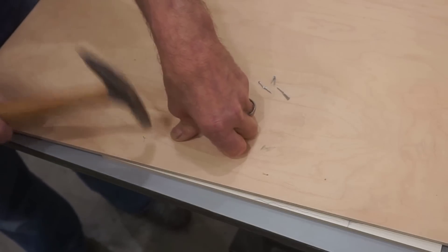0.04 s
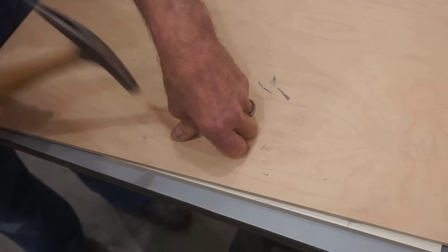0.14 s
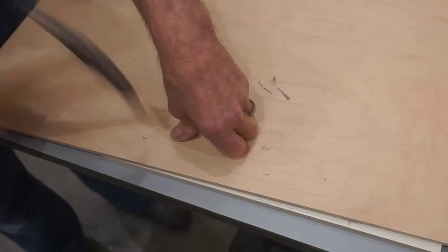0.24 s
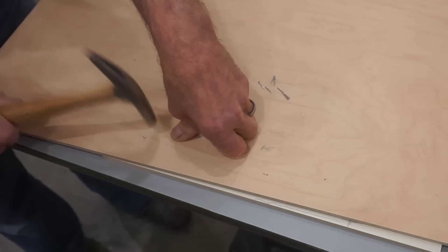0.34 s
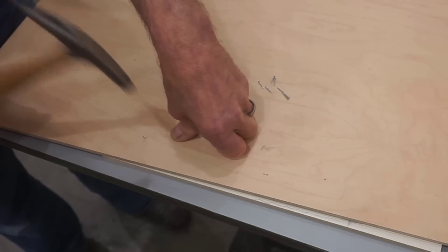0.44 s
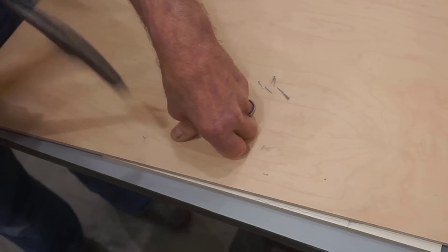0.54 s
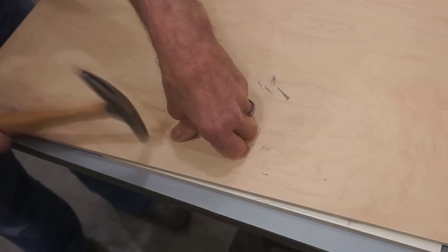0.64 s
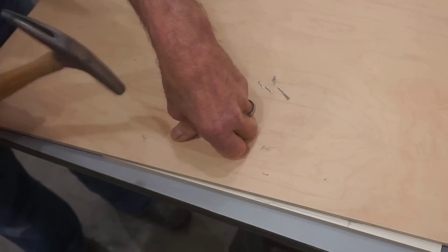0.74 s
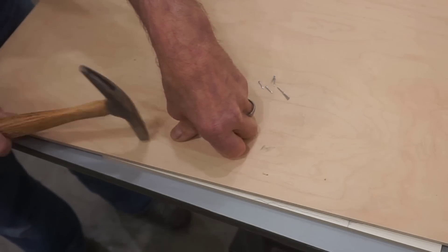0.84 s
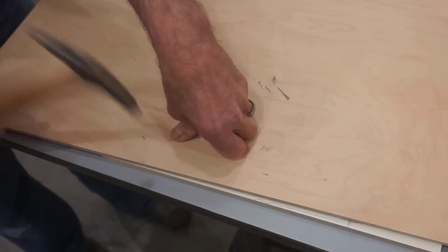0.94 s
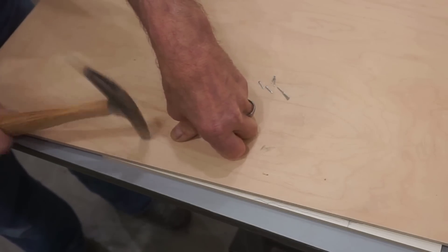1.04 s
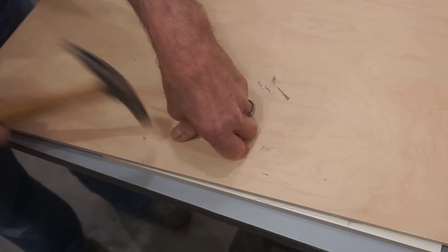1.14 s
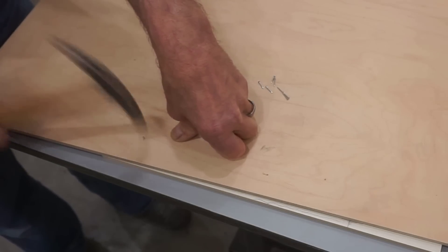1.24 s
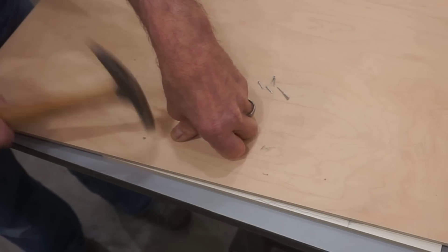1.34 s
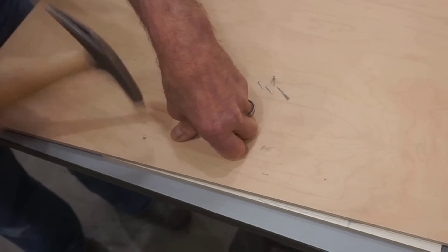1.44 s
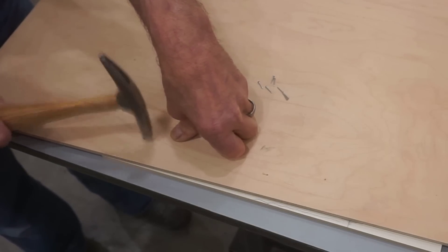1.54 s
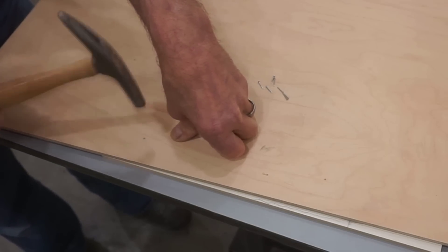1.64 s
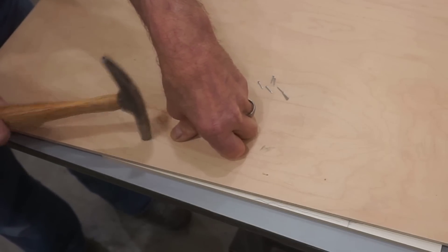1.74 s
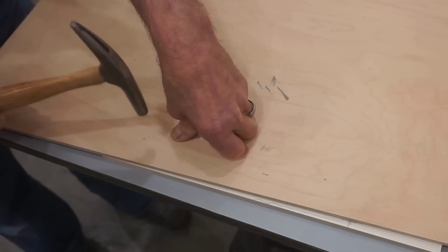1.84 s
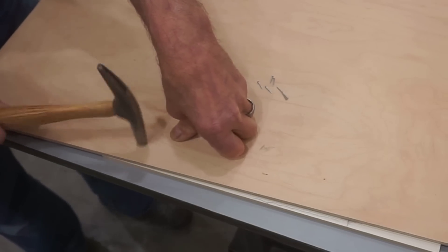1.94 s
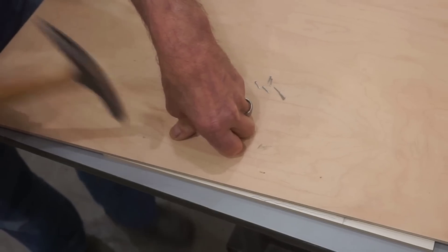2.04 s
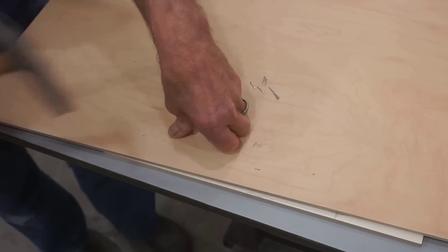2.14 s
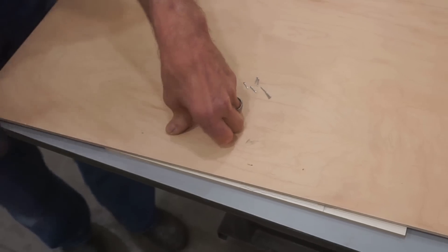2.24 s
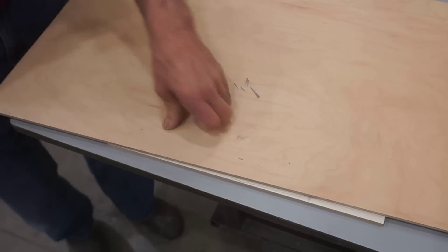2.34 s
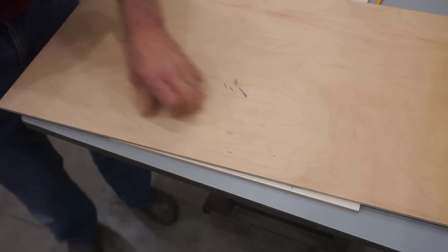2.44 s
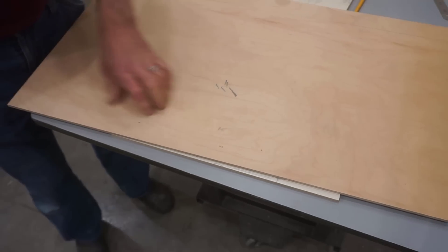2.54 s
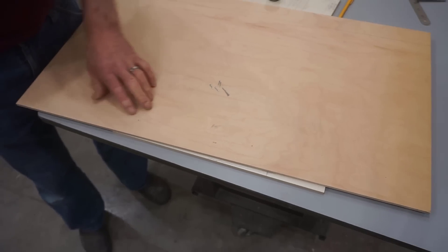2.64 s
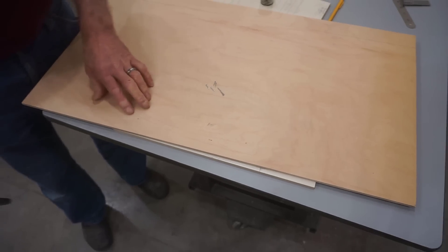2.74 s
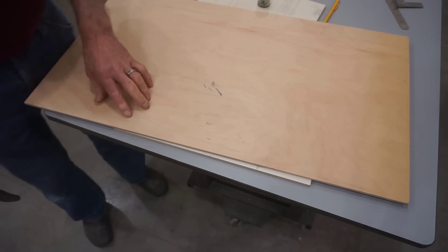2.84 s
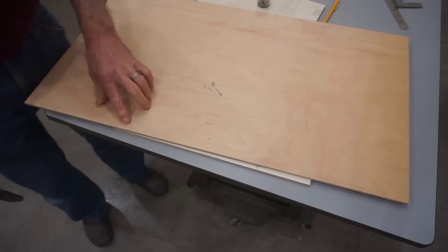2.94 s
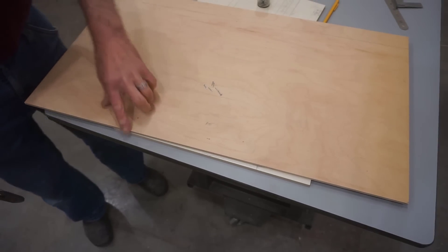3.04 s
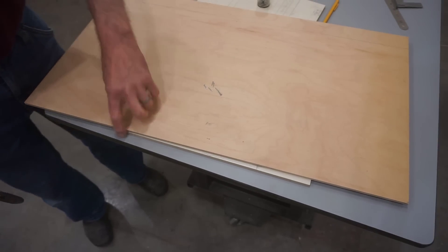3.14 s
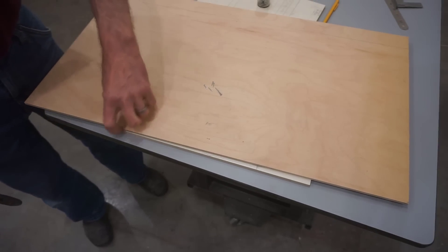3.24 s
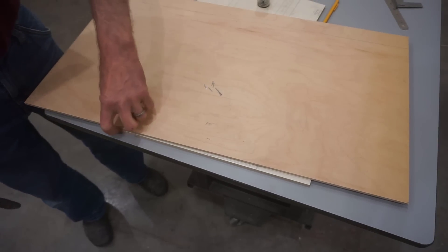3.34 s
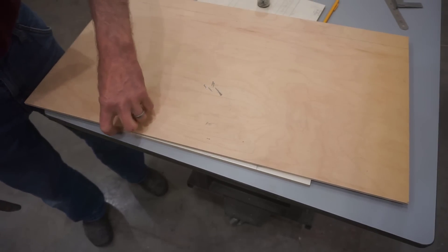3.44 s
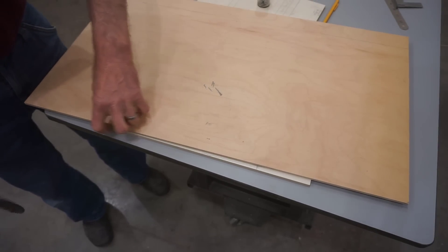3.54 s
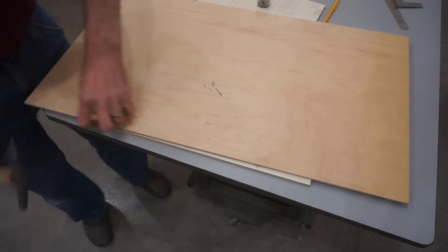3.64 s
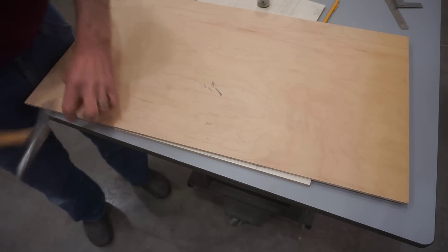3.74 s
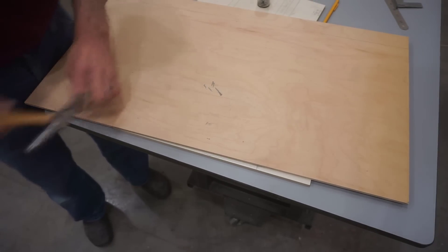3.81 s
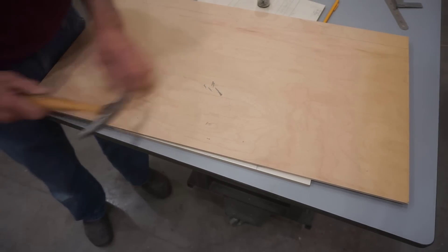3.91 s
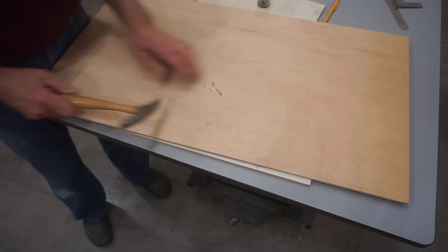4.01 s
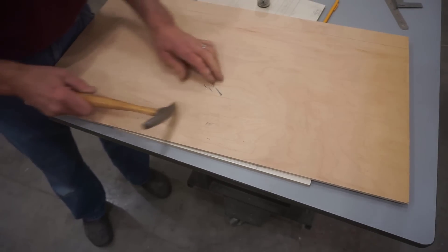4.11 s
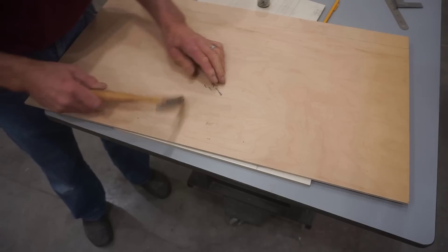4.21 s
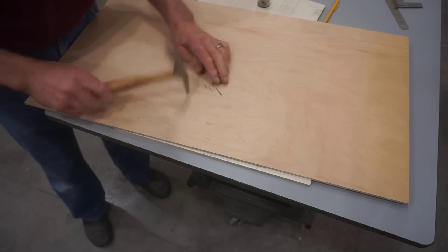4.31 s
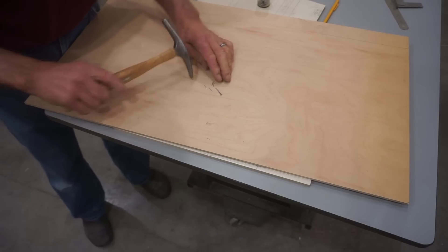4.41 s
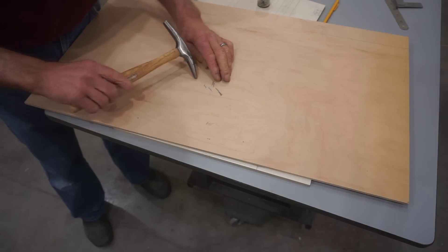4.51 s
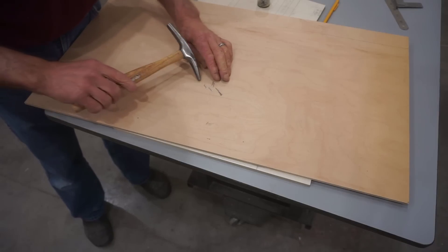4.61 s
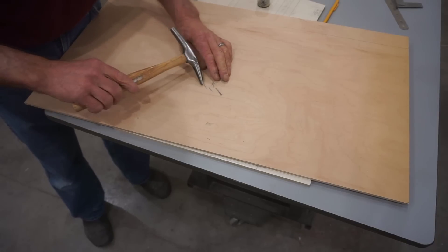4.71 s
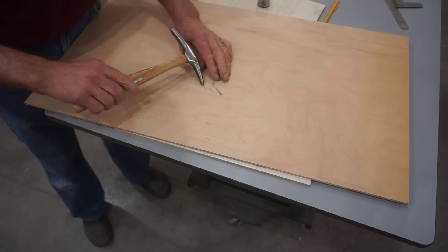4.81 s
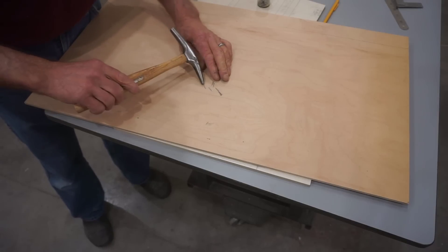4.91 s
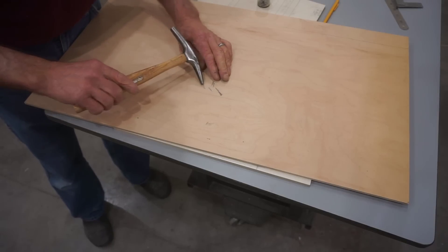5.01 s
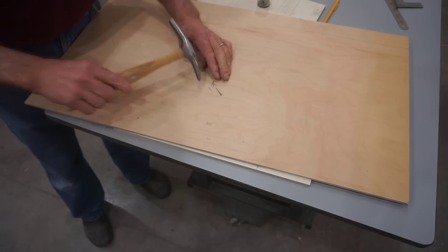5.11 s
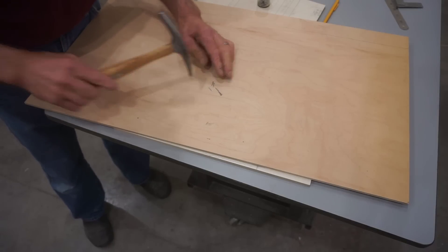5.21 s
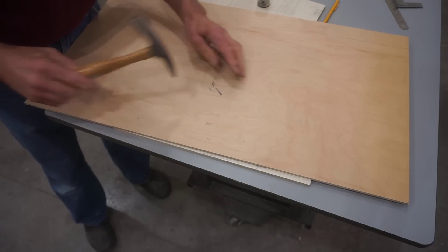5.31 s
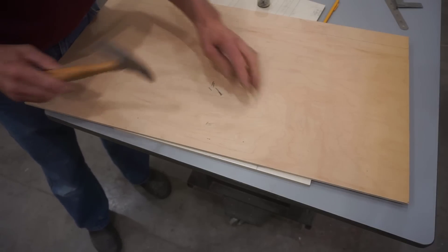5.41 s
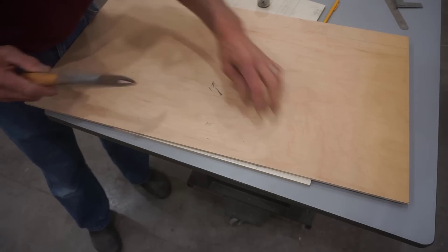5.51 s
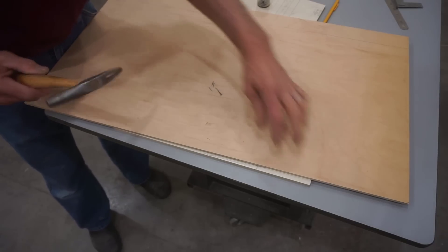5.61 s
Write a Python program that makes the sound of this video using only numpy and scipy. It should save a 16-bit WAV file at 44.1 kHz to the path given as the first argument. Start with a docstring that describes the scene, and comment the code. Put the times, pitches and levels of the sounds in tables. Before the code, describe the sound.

Nine sharp hammer strikes on a small nail in thin plywood come in a fast run, close and slightly distorted, with a short workshop echo and some rattling of the board. It then turns much quieter: skin brushes across the wood and loose nails click. Two light knocks of the hammer follow, then a tiny metallic ring from a nail. A faint low buzz and steady hiss lie underneath.

```python
"""A tack hammer drives a brad into a thin plywood panel on a workbench with nine quick blows.
Each impact excites modes of panel, steel and bench, fills the workshop and overloads the microphone;
after the hardest the panel lifts and rattles. Then a hand slides over the wood with a hiss of friction
and loose brads tick. The hammer taps twice lightly, and a brad rings as it jumps to the hammer's magnet.
A faint low buzz and a steady hiss lie under it all."""
import sys
import numpy as np
from scipy import signal
from scipy.fft import rfft, irfft
from scipy.io import wavfile

SR = 44100
rng = np.random.default_rng(int(sys.argv[2]) if len(sys.argv) > 2 else 0)


def wav_record(signal):
    """Record a signal, one row per channel, as 16-bit PCM in the file named by sys.argv[1]."""
    frames = np.transpose(np.atleast_2d(signal))
    bounded = np.clip(frames, -1, 1)
    # unit amplitude maps onto the largest positive 16-bit level
    quanta = np.round(bounded * 32767).astype(np.int16)
    wavfile.write(sys.argv[1], SR, quanta)


N = 249606

# hammer blows on the brad: start_s, force_db, crack_db
BLOWS = [(0.0663, 7.5, 8.5), (0.3666, 16.5, 7), (0.6814, 6.5, 6), (0.9143, 7.5, 8.5), (1.1344, 10.5, 14.5),
         (1.3526, 8.5, 15.5), (1.5743, 11, 13.5), (1.7844, 15, 12), (1.9913, 16.5, 6)]
# modes of the plywood panel, the hammer head on the brad and the bench top: pitch_hz, level_db, t60_s
PANEL_MODES = [(430, -14, 0.019), (514, -8.5, 0.087), (582, -12, 0.097), (639, -2, 0.14),
               (694, -5.5, 0.058), (785, -10.5, 0.06), (886, -9.5, 0.1), (980, -10.5, 0.025),
               (1358, -6.5, 0.012), (1658, -6, .04), (1955, -13.5, 0.093)]
STEEL_MODES = [(2460, -4, .02), (3260, 9, 0.032), (3700, -3, 0.091), (4560, -8, 0.038), (4660, -5.5, 0.012),
               (5074, -6.5, 0.017), (5150, -4, 0.0087), (5930, -2.5, .025)]
BENCH_MODES = [(77, -14.5, 0.24), (99.3, -1, 0.27), (122.6, -3, 0.13), (158.4, 0.5, 0.084),
               (212.5, -5.5, 0.2), (278, 2, 0.098)]
# spectra of the crowded, quickly damped modes of wood and of steel: frequency_hz, density_db
WOOD_CLACK = [(40, -31.5), (150, -24), (330, -12), (450, -0.5), (650, 0.5), (900, 0), (1600, -8.5),
              (2300, -14), (4000, -17.5), (9000, -38)]
STEEL_CRACK = [(100, -28.5), (1000, -8), (2400, -9), (3500, -4.5), (4700, 0.5), (6300, 1), (7300, -10),
               (8500, -18.5), (11000, -37.5)]
def hammer(firm_db=8.5, firm_contact_hz=4230, doubling_db=19, lift_db=11.5):
    """Impact excitation: a harder blow has a shorter, brighter contact and leaves a longer ring."""
    out = np.zeros(N)
    for start_s, force_db, crack_db in BLOWS:
        hardness = 2 ** ((force_db - firm_db) / doubling_db)
        sustain = .9 * hardness
        pitch = 1 + .014 * rng.standard_normal()   # the panel's modes shift from blow to blow
        panel = from_db(-2.5) * ringing(PANEL_MODES, pitch, sustain)
        panel += from_db(-2) * burst(WOOD_CLACK, t60_s=.045)
        panel = butter(panel, firm_contact_hz * hardness, "low")
        steel = burst(STEEL_CRACK, t60_s=.025 * sustain) + from_db(-15.5) * ringing(STEEL_MODES)
        bench = from_db(-6.5) * ringing(BENCH_MODES)   # equally loud for every blow
        add(out, start_s, workshop(from_db(force_db) * panel + from_db(crack_db) * steel + bench))
        if force_db > lift_db:
            add(out, start_s, workshop(rattle(force_db)))
    return out


# spectrum of the panel clapping on the bench: frequency_hz, density_db
PANEL_CLAP = [(200, -27), (500, -5.5), (850, 1), (1500, 0.5), (2300, -14), (5000, -22.5), (9000, -39)]
def rattle(force_db, claps=6, gap_s=.028, loss_db=3):
    """Rebound with loss: the lifted panel claps back at uneven intervals, each time more weakly."""
    out = np.zeros(SR)
    for k in range(claps):
        start_s = gap_s * (k + 1 + rng.uniform(-.3, .3))
        level_db = force_db - 12.5 - loss_db * k
        add(out, start_s, from_db(level_db) * burst(PANEL_CLAP, t60_s=.05))
    return out


# light taps of the hammer head on the bare panel: start_s, level_db, pitch_ratio
TAPS = [(4.253, -16, 1.0), (4.5640, -9, .85)]
# spectrum of steel clicking on wood: frequency_hz, density_db
STEEL_CLICK = [(300, -8), (1700, -3), (2400, 2), (3400, 6.5), (4500, 2.5), (6000, 6.5), (7500, -8),
               (11000, -38)]
def taps(contact_hz=1110, rebound_s=.003):
    """Light impact: a dull, damped knock and a double click; where it lands shifts the panel's modes."""
    out = np.zeros(N)
    for start_s, level_db, pitch in TAPS:
        panel = from_db(-5.5) * ringing(PANEL_MODES, pitch, sustain=.42)
        panel += from_db(-1.5) * burst(np.array(WOOD_CLACK) * [pitch, 1], t60_s=.04)
        click = from_db(-17) * burst(STEEL_CLICK, t60_s=.01)
        tap = butter(panel, contact_hz, "low") + click
        add(tap, rebound_s, from_db(-4) * click)   # the head lands on one edge, then on its face
        tap = workshop(tap, room_db=-9.5, first_echo_s=.0053, early_gain=1.6)
        add(out, start_s, from_db(level_db) * tap)
    return out


# soft thumps and touches on the panel: start_s, level_db, pitch_ratio
TOUCHES = [(0.037, -7.5, 0.21), (4.126, -48, 1), (4.975, -53, 0.82), (5.385, -43, 0.82)]
def touches():
    """Mass loading: a soft touch excites the panel's modes, lowered by any weight resting on it."""
    out = np.zeros(N)
    for start_s, level_db, pitch in TOUCHES:
        add(out, start_s, workshop(from_db(level_db) * ringing(PANEL_MODES, pitch)))
    return out


# ticks of loose brads against wood and steel: start_s, level_db
BRAD_TICKS = [(2.4703, -40), (3.2558, -49), (3.2859, -41), (3.312, -49), (4.383, -53), (4.85, -47),
              (5.1468, -47.5)]
# modes of a loose brad: pitch_hz, level_db, t60_s
BRAD_MODES = [(3030, -7, .025), (3300, -2, 0.031), (3470, 6, 0.083), (3960, -6, .045), (6300, -15, 0.044)]
def brads(jump_s=5.153, jump_db=-38.5):
    """Free vibration: loose brads tick with a faint ring; one rings clearly on jumping to the magnet."""
    out = np.zeros(N)
    for start_s, level_db in BRAD_TICKS:
        tick = burst(STEEL_CLICK, t60_s=.025) + from_db(-14) * ringing(BRAD_MODES)
        add(out, start_s, from_db(level_db) * workshop(tick))
    add(out, jump_s, from_db(jump_db) * workshop(ringing(BRAD_MODES), room_db=-16))
    return out


# strokes of the hand over the panel: start_s, length_s, peak_db
STROKES = [(2.44, 0.18, -41.5), (2.6, 0.19, -43.5), (2.85, 0.26, -51), (3.022, 0.39, -46),
           (3.496, 0.33, -44.5), (3.831, .12, -52.5), (3.98, 0.085, -55.5), (4.12, 0.43, -49),
           (4.72, 0.11, -37.5), (4.963, 0.031, -54), (5.09, 0.091, -62), (5.304, 0.14, -54),
           (5.437, 0.27, -52.5)]
# spectrum of skin rubbing on wood: frequency_hz, density_db
SKIN_FRICTION = [(150, 1), (500, 3), (1100, 1), (2200, -11.5), (3600, -4), (4800, -7), (6300, 1),
                 (7500, -15.5), (9000, -25)]
def hand(peak_share=.4, roundness=.78):
    """Friction noise: skin hisses over the grain, swelling and fading with the speed of each stroke."""
    t, speed = np.arange(N) / SR, np.zeros(N)
    for start_s, length_s, peak_db in STROKES:
        rise_and_fall = np.interp((t - start_s) / length_s, [0, peak_share, 1], [0, 1, 0])
        speed += from_db(peak_db) * np.sin(np.pi / 2 * rise_and_fall) ** roundness
    return speed * noise(SKIN_FRICTION, N)


# spectrum of the steady hiss: frequency_hz, density_db
HISS = [(30, 6.5), (100, 2), (250, -13), (600, -11.5), (1500, -22), (3000, -23.5), (6200, -22.5),
        (8500, -26.5), (11000, -25.5)]
def background(period_s=.023981, first_s=.0163, corner_hz=210):
    """Periodic pulses make a harmonic buzz; a hum lies on its third harmonic, over steady hiss."""
    times = np.arange(first_s, N / SR, period_s)
    pulses = np.zeros(N)
    pulses[(times * SR).astype(int)] = 1 + .12 * rng.standard_normal(len(times))
    age = 2 * np.pi * corner_hz * np.arange(SR // 40) / SR
    buzz = signal.fftconvolve(pulses, age * np.exp(1 - age))[:N]   # rounds each pulse
    hum = np.cos(6 * np.pi * (np.arange(N) / SR - first_s - .001) / period_s)
    return from_db(-37.5) * (buzz - buzz.mean()) + from_db(-53.5) * hum + from_db(-46.5) * noise(HISS, N)


# spectrum of the workshop's reverberation: frequency_hz, density_db
ROOM_COLOUR = [(80, -8.5), (250, 5.5), (600, -2), (1200, 1.5), (2500, -3), (5500, 0), (8000, -3.5),
               (11000, -10)]
# reverberation time by band: frequency_hz, t60_s
ROOM_DECAY = [(100, 0.75), (500, 0.7), (1400, 0.81), (4000, 0.73), (6500, 0.61), (10000, 0.83)]
def workshop(x, room_db=-9, first_echo_s=.012, build_s=.009, early_gain=.87, early_s=.015):
    """Reverberation: after the direct sound a diffuse field builds up, then decays band by band."""
    t, hz = np.arange(SR) / SR, np.fft.rfftfreq(SR, 1 / SR)
    field = rfft(noise(ROOM_COLOUR, SR))
    centres_hz, tail = np.array(ROOM_DECAY)[:, 0], np.zeros(SR)
    for share, (_, t60_s) in zip(np.eye(len(centres_hz)), ROOM_DECAY):
        band = irfft(field * at_hz(np.c_[centres_hz, share], hz), SR)
        tail += band * from_db(-60 * t / t60_s)
    tail *= np.clip((t - first_echo_s) / build_s, 0, 1)
    tail *= 1 + early_gain * np.exp(-t / early_s)   # bench, body and floor reflect first and strongest
    response = from_db(room_db) * tail / np.linalg.norm(tail)
    response[0] = 1   # the direct path
    return signal.fftconvolve(x, response)


def ringing(modes, pitch=1, sustain=1, scatter_db=4):
    """Modal superposition: damped sines, among which each strike shares its energy differently."""
    t = np.arange(SR // 2) / SR
    hz, level_db, t60_s = np.transpose(modes)[:, :, None]
    struck_db = level_db + scatter_db * rng.standard_normal(level_db.shape)
    envelopes = from_db(struck_db - 60 * t / (t60_s * sustain))
    signs = (-1) ** np.arange(len(modes))[:, None]
    partials = signs * envelopes * np.sin(2 * np.pi * hz * pitch * t)
    return np.sqrt(sustain) * as_hit(partials.sum(axis=0))


def burst(spectrum, t60_s):
    """Modal overlap: modes too crowded to tell apart merge into decaying noise with a smooth spectrum."""
    t = np.arange(SR // 2) / SR
    colour = from_db(at_hz(spectrum, np.fft.rfftfreq(len(t), 1 / SR)))
    x = rng.standard_normal(len(t)) * from_db(-60 * t / t60_s)
    for _ in range(4):   # impose the spectrum and the short decay in turn
        phase = np.angle(rfft(x))
        x = irfft(colour * np.exp(1j * phase), len(t)) / (1 + (t / t60_s) ** 4)
    return as_hit(x)


def noise(spectrum, size):
    """Spectral shaping: white noise takes on a colour, at rms 1."""
    colour = from_db(at_hz(spectrum, np.fft.rfftfreq(size, 1 / SR)))
    x = irfft(rfft(rng.standard_normal(size)) * colour, size)
    return x / x.std()


def as_hit(x):
    """Normalisation to the energy of 15 ms at rms 1."""
    return x / np.sqrt(np.sum(x ** 2) / (.015 * SR))


def from_db(db):
    """Decibels to amplitude ratio."""
    return 10 ** (np.asarray(db) / 20)


def at_hz(points, hz):
    """Interpolation of a table on a log-frequency axis."""
    points_hz, values = np.transpose(points)
    return np.interp(np.log(np.maximum(hz, 1)), np.log(points_hz), values)


def butter(x, hz, kind, order=2):
    """Causal low- or high-pass filtering."""
    return signal.sosfilt(signal.butter(order, min(hz, .45 * SR), kind, fs=SR, output="sos"), x)


def add(track, start_s, sound):
    """Superposition: a sound joins a track at start_s."""
    start = round(start_s * SR)
    track[start:start + len(sound)] += sound[:len(track) - start]


def nearly_mono(x, side_db=-32):
    """Near-mono: left and right differ only faintly, by a thinly scattered copy of the sound."""
    scatter = rng.standard_normal(SR // 100)
    side = from_db(side_db) * signal.fftconvolve(x, scatter / np.linalg.norm(scatter))[:N]
    return np.array([x + side, x - side])


def scene():
    """Superposition: all sources sum at one point above the bench."""
    return nearly_mono(hammer() + taps() + brads() + touches() + hand() + background())


def gain_control(x, threshold_db=-1.5, deepest_db=12, recovery_db_per_s=2.5, smoothing_samples=1500):
    """Compression: loud blows pull the gain down at once; it creeps back over seconds."""
    step = 1 / smoothing_samples
    power = signal.lfilter([step], [1, step - 1], np.mean(x ** 2, axis=0))
    cut_db = np.clip(10 * np.log10(power + 1e-12) - threshold_db, 0, deepest_db)
    cut_db[0] = deepest_db   # the gain starts at its lowest
    recovery_db = recovery_db_per_s * np.arange(N) / SR
    return x * from_db(recovery_db - np.maximum.accumulate(cut_db + recovery_db))


def overload(x, ceiling=.32):
    """Clipping flattens the peaks; an all-pass phase shift then turns the flat tops ragged."""
    clipped = x / (1 + (x / ceiling) ** 6) ** (1 / 6)
    return signal.lfilter([.74, -1], [1, -.74], -clipped)


def fore_knock(x, lead_s=.0452, level_db=-33.5, ceiling=8.3):
    """Pre-echo: a faint, dull, softly saturated copy of the sound knocks just ahead of each blow."""
    lead = round(lead_s * SR)
    early = np.pad(x[:, lead:], ((0, 0), (0, lead)))
    early = ceiling * np.tanh(early / ceiling)
    body = butter(early, 1000, "low") + from_db(9) * butter(early, 260, "low", order=1)
    bright_edge = from_db(-26) * butter(early, 9000, "high")
    return from_db(level_db) * (body + bright_edge)


def record(dry, low_cut_hz=32, soft_top_hz=9500, cutoff_hz=11100):
    """Band limiting: the compressed, clipped sound and its pre-echo lose deep bass and top treble."""
    x = overload(gain_control(dry)) + fore_knock(dry)
    x = butter(butter(x, low_cut_hz, "high"), soft_top_hz, "low")
    return signal.sosfilt(signal.ellip(10, .3, 80, cutoff_hz, fs=SR, output="sos"), x)


dry = scene()
out = record(dry)
wav_record(out)
```